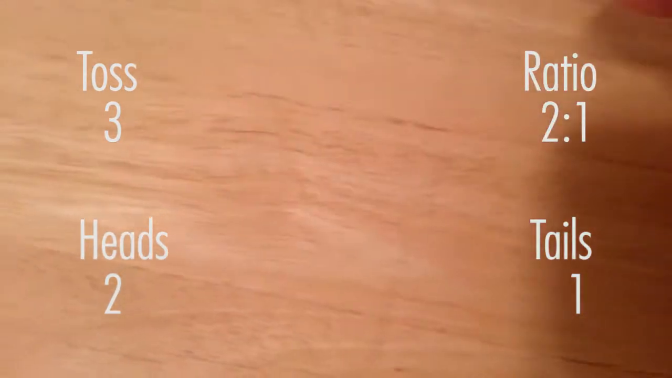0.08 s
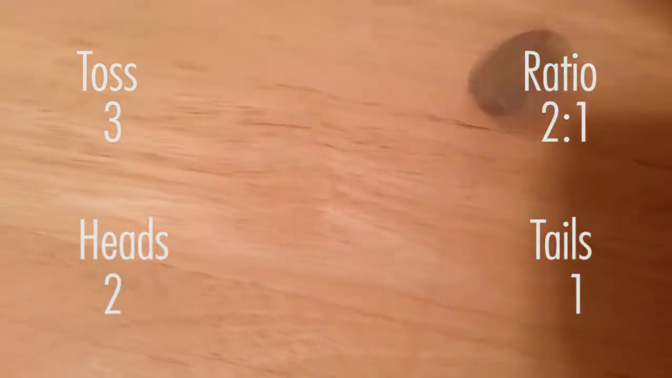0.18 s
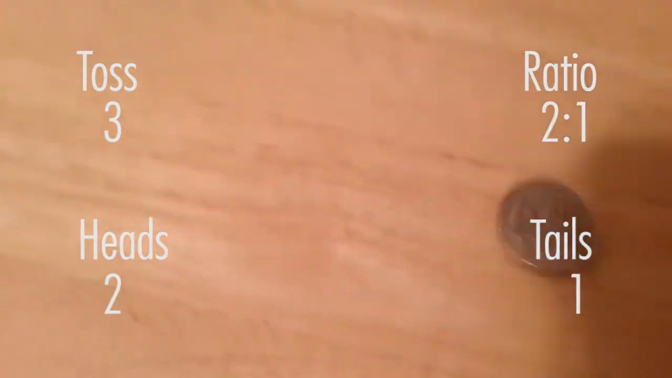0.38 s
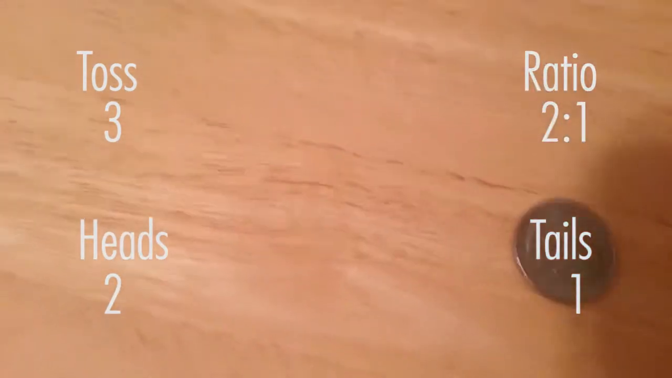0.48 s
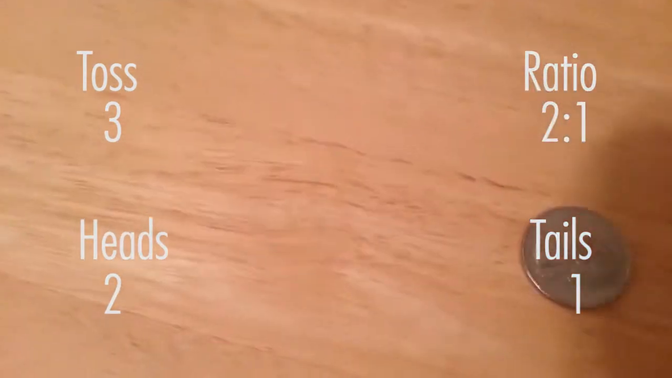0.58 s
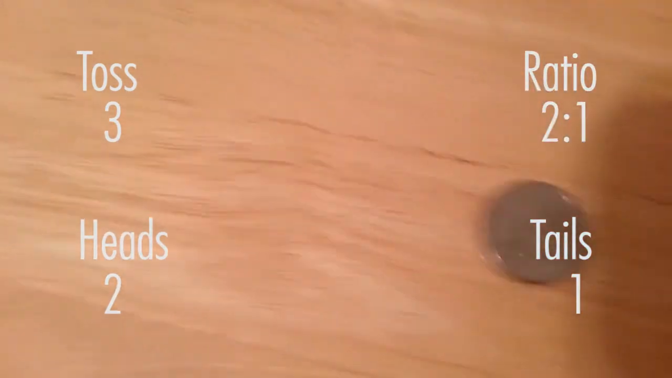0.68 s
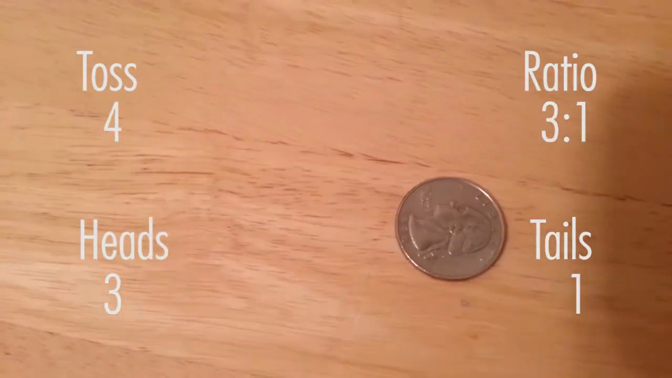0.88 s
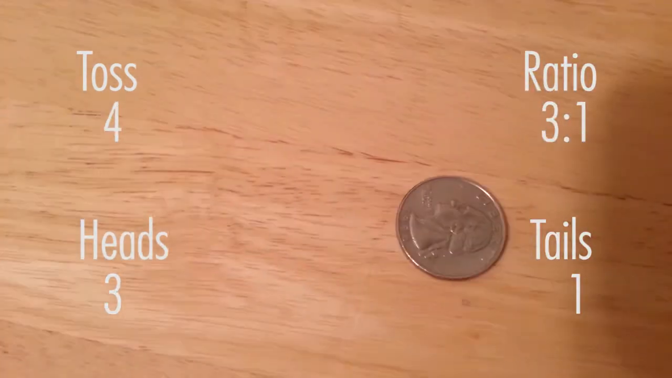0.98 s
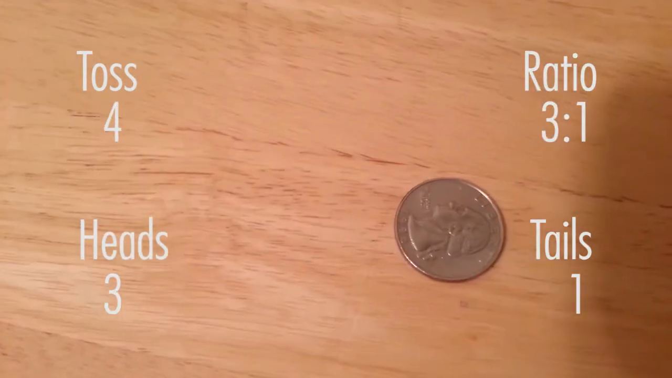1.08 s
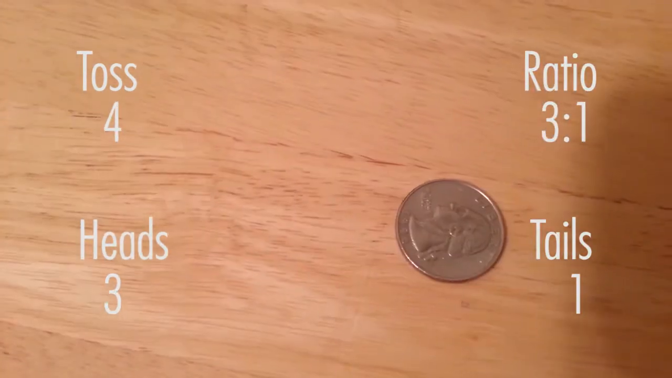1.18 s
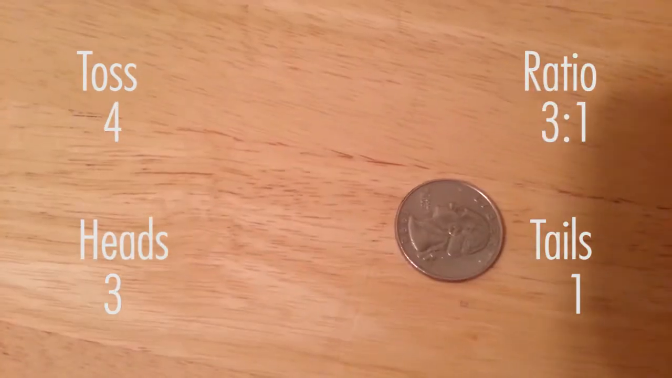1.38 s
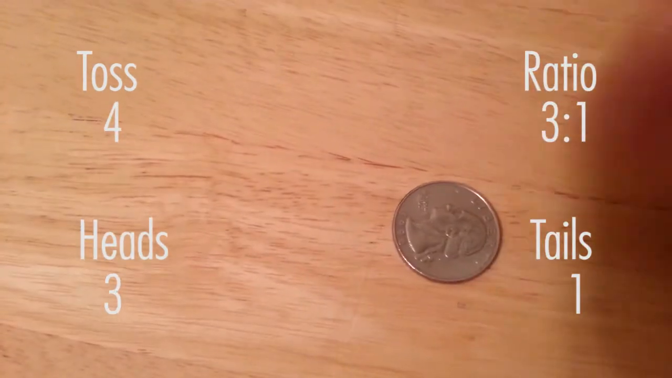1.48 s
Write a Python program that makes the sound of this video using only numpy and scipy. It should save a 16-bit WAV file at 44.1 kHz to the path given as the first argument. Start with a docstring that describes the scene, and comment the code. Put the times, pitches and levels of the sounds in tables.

```python
"""First a low hum with hiss, a faint fuzzy tone dying away and soft low bumps; then a metal coin lands
on a wooden table in a small quiet room, bounces and wobbles to rest.
Each touch is a force that excites the modes of the table top and rings the coin, damping earlier rings.
A rolling rim adds tiny taps and sizzle; decaying noise makes the reverberation.
Two close microphone ports hear it all and clip peaks above their ceiling."""
import sys
import numpy as np
from scipy import signal
from scipy.fft import rfft, irfft
from scipy.io import wavfile
from scipy.ndimage import uniform_filter1d

SR = 44100
rng = np.random.default_rng(int(sys.argv[2]) if len(sys.argv) > 2 else 0)


def persist_wave(psi):
    """Save psi, clipped to +-1, as 16-bit WAV."""
    counts = np.round(np.clip(psi, -1, 1) * 32767).astype(np.int16)
    wavfile.write(sys.argv[1], SR, np.atleast_2d(counts).T)


N = 66150


def amp(db):
    """Decibel law: level to amplitude ratio."""
    return 10 ** (np.asarray(db) / 20)


def evened(x):
    """Normalization to unit root-mean-square."""
    return x / np.sqrt(np.mean(x ** 2) + 1e-20)


def read(points, hz):
    """Interpolation along logarithmic frequency."""
    f, value = np.transpose(points)
    return np.interp(np.log(hz + 1), np.log(f + 1), value)


def envelope(points):
    """Amplitude envelope: levels joined linearly in dB, nearly silent outside the points."""
    return amp(np.interp(np.arange(N) / SR, *np.transpose(points), left=-120, right=-120))


def highpass(x, hz, order=2):
    """Butterworth high-pass filtering."""
    return signal.sosfilt(signal.butter(order, hz, "high", fs=SR, output="sos"), x)


def convolved(x, response):
    """Linear superposition: the response to each sample of x, cut to the scene's length."""
    return signal.fftconvolve(np.atleast_2d(x), np.atleast_2d(response), axes=1)[:, :N]


def pair(frames, size, same):
    """Partial coherence: two partly alike arrays of random short-time spectra, and their frequencies."""
    hz = np.fft.rfftfreq(size, 1 / SR)
    a, b, c, d = rng.standard_normal((frames, len(hz), 4)).T
    like = np.clip(read(same, hz), -1, 1)[:, None]
    left = a + 1j * b
    right = like * left + np.sqrt(1 - like ** 2) * (c + 1j * d)
    return hz, np.array([left, right])


def causal(points, size):
    """Minimum phase: the Hilbert transform of log gain gives a causal click, here of unit energy."""
    log_gain = np.log(amp(read(points, abs(np.fft.fftfreq(size, 1 / SR)))))
    click = np.fft.ifft(np.exp(log_gain - 1j * signal.hilbert(log_gain).imag)).real[:size // 2]
    return click / np.linalg.norm(click)


def ringing(modes, t):
    """Modal superposition: a sum of exponentially dying sines, as each port hears them."""
    side = np.array([[.5], [-.5]])  # left, right
    total = 0
    for hz, db, t60, pan_db, lead in modes:
        level = amp(db + side * pan_db - 60 * t / t60)
        total = total + level * np.sin(2 * np.pi * hz * t + side * lead)
    return total


# touches of the coin: (time [s], strength [dB], thud shelf [dB], brightness shelf [dB],
# lasting ring [relative dB], short clink [relative dB], skid scale [s])
TOUCH_EVENTS = [(0.2073, 17, 5, -12, -24, -48, 0.02), (0.2738, 8, 8, -19, -20, -23, 0.0022),
                (.278, 3.5, 5.5, -12, -28, -30, 0.004), (0.3316, 2.5, -2, -20, -16.5, -36, 0.0019),
                (.353, 11.5, -1, 10.5, -9.5, -2, 0.0032), (.359, 5, -1.5, 14, 3, -3, 0.0037),
                (0.4193, 5, 0, 7.5, -12.5, -23, 0.0018), (0.4317, 9.5, -2, 12.5, -15, -8, 0.0015),
                (0.4367, 3.5, 2, 16, -10.5, 0, 0.0029), (0.4494, -3.5, -5, 8, -5.5, 8.5, 0.0026),
                (0.488, 2, -3, 12.5, -18, -13, 0.0015), (0.4962, 8, -0.5, 14, -13, -4, 0.0014),
                (0.5004, 0.5, 3, 6, -9, 4, 0.0032), (0.5105, -4.5, -9, -1, 4.5, 10, 0.0047),
                (0.5399, -4, 5.5, 13, -1, 11, 0.0016), (0.5491, 6, -17, 13, -24, -15, 0.0024),
                (0.5508, -5, -18, 10, 4, 7, 0.00058), (0.5558, -1, -19, 10, 7, 0, 0.0035),
                (0.5707, -7, 7, 12, 2, 15, 0.00074), (0.5862, -1.5, -6, 13, 4, 4, 0.0017),
                (0.5945, 2, -4, 10, 7, -3, 0.00067), (0.5975, -1.5, 1, -7, 2, 7, 0.00094),
                (0.5998, -4.5, -5, 15.5, 0, 15, 0.0012), (0.6025, -6.5, -6, 14, -1, 16, 0.00057),
                (.609, -9.5, -15, 12, 18, 17, 0.0051), (.618, -19, -5, 18, 26, 19, 0.0018),
                (0.6301, -20, -10, -7, 28, 8, 0.005), (.6357, -6.5, -12, 13, 12, 18.5, 0.0034),
                (0.6377, -2, -26, 12, -8, 2, 0.0037), (0.643, -8, -21, -14, 13, 1, 0.0019),
                (.658, -21, -10, 13, 10, 16, 0.0012), (0.665, -9.5, -12, 14, 2, 3, 0.0018),
                (0.6728, -6, -9, 13, 2, 5, 0.0028), (0.6763, -1.5, -35, 8.5, 6, -6, 0.0015),
                (0.71, -6, -16, 13, -2, 1, 0.0037), (0.7123, -5, -20, 8, 8.5, -16, 0.0057),
                (0.7445, -5.5, -17, 8, -5, 2, 0.0011), (0.7471, 1, -5, 11, -23, -20, 0.0023),
                (0.7538, -15, 5, 7, -7, 2, 0.0007), (0.7623, -9.5, 15, 12, 1, 1, 0.00067),
                (0.772, -8, 3, 1, -3, -2, 0.0022), (.776, -2.5, -25, 12, 1.5, -4, 0.0016),
                (0.7907, -15, -20, -5, 16, 5, 0.00074), (0.805, 0, -39, 10.5, -10, -8, 0.0026),
                (0.8307, -6.5, -15, 14, 0, -14, 0.0022), (0.839, -19, -10, -5, 14.5, 5, 0.0024),
                (0.8548, -5, 3, 13.5, -22, -15, 0.0059), (0.8622, -11, -13, 13.5, -19, -16, 0.00088),
                (0.8744, -2.5, 5, 8.5, -1, -14, 0.0035), (0.8907, -3, -7, 10, -6, -16, 0.0026),
                (0.9047, -10.5, 1, 7, -33, -18, 0.0011)]
# rim rolling on the wood: (time [s], relative level [dB])
ROLL_LEVELS = [(.48, -56), (.55, -49), (.62, -49), (0.701, -48), (.75, -66), (0.818, -40.5), (0.9, -43.5),
               (.912, -79)]
ROLL_PER_S = 1500  # mean taps per second
THUD_HZ, BRIGHT_HZ = 700, 4450  # corners of the low and high shelves
TAP_DB, TAP_FADE_DB_PER_S = 0, -14  # the first tap softens as the coin lies flatter
EVEN_HZ = 400  # a skid pushes evenly across bands of this width
SPOTS = 4  # places on the table that the coin hits
SETTLE_S = .65  # from here on the coin stays on its last two spots


def contacts():
    """Impact and friction: a tap and short skid per touch, by spot, and random taps of the rolling rim."""
    taps, t = np.zeros((SPOTS, N)), np.arange(1024) / SR
    grit = rng.standard_normal((len(TOUCH_EVENTS), 1024)) ** 3
    hz = np.fft.rfftfreq(2048, 1 / SR)
    low = 1 / (1 + 1j * hz / THUD_HZ) ** 2
    high = 1 / (1 - 1j * BRIGHT_HZ / (hz + 1)) ** 2
    first_s = TOUCH_EVENTS[0][0]
    for k, (s, db, thud_db, bright_db, _, _, skid_s) in enumerate(TOUCH_EVENTS):
        u = t / np.clip(skid_s / 2, .0003, .0025)
        push = rfft(grit[k] * np.sqrt(u) * np.exp(-u), 2048)
        push = push / np.sqrt(uniform_filter1d(abs(push) ** 2, size=round(EVEN_HZ / hz[1])))
        skid = irfft(push)[:1024]
        tap = amp(TAP_DB + TAP_FADE_DB_PER_S * (s - first_s)) * (t == 0)
        force = tap + skid / np.linalg.norm(skid)
        shelves = (1 + (amp(thud_db) - 1) * low) * (1 + (amp(bright_db) - 1) * high)
        force = irfft(rfft(force, 2048) * shelves)
        spot = k % 2 + 2 * (s > SETTLE_S)
        taps[spot, round(s * SR):][:2048] += amp(db) * force
    rim_taps = rng.standard_normal(N) * (rng.random(N) < ROLL_PER_S / SR)
    return taps, rim_taps * envelope(ROLL_LEVELS) * amp(20.5)


# table-top modes: (frequency [Hz], level [dB], t60 [s], left over right [dB], left phase lead [rad])
TABLE_MODES = [(150, -10, .17, 1, -.1), (253, -4, .14, 1, 0), (367, -1, .15, 1, .2), (495, -2, .12, 1, .3),
               (555, 0, .11, 3, .1), (680, -5, .08, 0, .2), (955, -3, .12, -5, 1.4),
               (1104, -4, .13, -2, 2.6), (1179, -2, .15, -1, .1), (1404, -4, .11, 0, -.8),
               (1842, -4, .1, -1, -2.3), (2030, -2, .11, -5, 1.7), (2320, -1, .1, 3, -1.2),
               (2747, -2, .13, -3, .3), (2945, -3, .11, -4, .8), (3181, -4, .09, -2, 0),
               (3352, -5, .09, 3, -.2), (4237, -5, .1, -7, .3), (4880, -6, .07, 3, .9),
               (4940, 0, .025, 3, .9), (5900, -6, .05, 1, 0)]
# how the modes answer where the coin settles: (frequency [Hz], level change [dB])
SETTLED_RESPONSE = [(150, -3), (253, -4.5), (367, -12), (495, -4), (555, 2.5), (955, 5), (1104, 0.5),
                    (1404, -15), (1842, 15), (2030, -2), (2320, 3.5), (2747, 2.5), (2945, -7), (3181, 4.5),
                    (4237, -3.5), (5900, -3)]
# spectrum of the click in the wood: (frequency [Hz], spectral level [dB per Hz])
KNOCK_SPECTRUM = [(30, -56), (70, -42.5), (250, -18), (500, -8), (1000, -7), (2000, -1), (3500, -5.5),
                  (5000, -17.5), (8100, -26.5), (11000, -32.5), (16000, -41.5)]
CLICK_DB, MODES_DB, TAIL_DB = -10, -7.5, -4.5
SPOT_DB, SPOT_LEAD = 2, .8  # most that a spot shifts a mode's level [dB] and phase gap [rad] by chance
LEAD_FULL_HZ = 1000  # below this the ports hear all spots more alike
PORT_LAG = 8  # samples by which the right port hears the click late


def table(force, settled):
    """Modal excitation: a click, the modes of the top as this spot wakes them, and reverberation."""
    t = np.arange(SR // 2) / SR
    modes = np.array(TABLE_MODES)
    hz = modes[:, 0].copy()
    level_chance, lead_chance = rng.uniform(-1, 1, (2, len(modes)))
    modes[:, 1] += SPOT_DB * level_chance + settled * read(SETTLED_RESPONSE, hz)
    modes[:, 4] += SPOT_LEAD * lead_chance * np.minimum(hz / LEAD_FULL_HZ, 1) ** 2
    response = ringing(modes, t) / np.linalg.norm(ringing(TABLE_MODES, t)[0])
    body = convolved(force, response)
    knock = convolved(force, causal(KNOCK_SPECTRUM, size=4096))[0]
    click = np.array([knock, np.roll(knock, PORT_LAG)])
    return amp(CLICK_DB) * click + amp(MODES_DB) * body + amp(TAIL_DB) * convolved(knock, tail())


# coin modes: (frequency [Hz], level [dB], t60 [s], left over right [dB], left phase lead [rad])
COIN_MODES = [(9512, 0, .28, 3, .1), (9760, -1, .035, 7, -.8), (10350, -7, .02, 2, .1),
              (8850, -10, .02, 3, -.1), (12500, -14, .012, -1, 0), (15190, -16, .015, -3, .4)]
RING_DB, RING_TAIL_DB = -25, -2.5
KEPT_DB = -4  # change of a ring's level at each further touch
DAMPING_DB_PER_S2, FLAT_FROM_S = 2500, .45  # the wood damps the ring more as the coin lies flatter
CLINK_S = .0016  # ring heard only while the rim touches; peaks at half this time
COIN_LEAD = .9  # most by which chance shifts the ports' phase gap at each touch [rad]
WOBBLE_DB, WOBBLE_S = 2, .004  # the tumbling disc beams its ring to and fro
CHATTER_DB, CHATTER_HZ = -20.5, 8500  # thin treble of metal on wood


def coin(taps, roll, room):
    """Damped plate vibration: touches ring the disc and damp earlier rings; rolling rings it briefly."""
    x, size = np.zeros((2, N)), SR // 4
    t, times = np.arange(size) / SR, np.array(TOUCH_EVENTS)[:, 0]
    leads = COIN_LEAD * rng.uniform(-1, 1, len(TOUCH_EVENTS))
    for k, (s, db, _, _, ring_db, clink_db, skid_s) in enumerate(TOUCH_EVENTS):
        later = np.searchsorted(times, s + t, side="right") - k - 1.  # touches since this one
        later = np.maximum(uniform_filter1d(later, size=40), 0)
        damped_db = KEPT_DB * later - DAMPING_DB_PER_S2 * max(s - FLAT_FROM_S, 0) * t
        rise = 1 - np.exp(-t / max(skid_s / 2, .0003))
        lasting = amp(ring_db + damped_db) * rise
        clink = amp(clink_db + 10.5) * (2 * t / CLINK_S) ** 2 * np.exp(1 - 4 * t / CLINK_S)
        shifted = np.array(COIN_MODES) + [0, 0, 0, 0, leads[k]]
        x[:, round(s * SR):][:, :size] += amp(db) * (lasting + clink) * ringing(shifted, t)
    x += amp(-2) * convolved(roll, ringing(COIN_MODES, t) * np.exp(-t / .0025))
    width = round(WOBBLE_S * SR)
    drift = uniform_filter1d(uniform_filter1d(rng.standard_normal((2, N)), width), width)
    x = amp(RING_DB) * x * amp(WOBBLE_DB * evened(drift))
    x += amp(CHATTER_DB) * highpass(taps + amp(9.5) * roll, CHATTER_HZ)
    return x + amp(RING_TAIL_DB) * signal.fftconvolve(x, room, axes=1)[:, :N]


# treble sizzle while the rim rolls: (time [s], level [dB])
SIZZLE_LEVELS = [(.36, -62), (.44, -50), (.53, -48), (.6, -36), (.65, -40), (.7, -54), (.77, -48),
                 (.83, -61), (.9, -58), (.92, -75)]
SIZZLE_PER_S, SIZZLE_HZ = 9000, 9000  # mean ticks per second, high-pass corner


def sizzle():
    """Random impulse noise: dense tiny ticks of metal on wood grain, unlike at the two ports."""
    ticks = rng.standard_normal((2, N)) * (rng.random((2, N)) < SIZZLE_PER_S / SR)
    return evened(highpass(ticks, SIZZLE_HZ)) * envelope(SIZZLE_LEVELS)


# reverberation: (frequency [Hz], t60 [s])
TAIL_DECAY = [(100, 0.12), (300, 0.13), (1000, 0.096), (3000, 0.09), (7000, .1), (10000, 0.04),
              (14000, 0.035)]
# reverberation at the two ports: (frequency [Hz], left-right likeness [-1 to 1])
TAIL_LIKENESS = [(100, 1), (400, 0.77), (1000, 0.0), (1800, -0.18), (3000, -0.0085), (10000, -0.31)]
LATE_DB, LATE_STRETCH = -6.5, 3.57  # the room's longer, weaker decay under the table's


def tail():
    """Diffuse reverberation of table and room: dense noise, each band dying at its own speed."""
    frames, hop = 400, 64
    hz, z = pair(frames, size=256, same=TAIL_LIKENESS)
    t = np.arange(frames) * hop / SR
    fall_db = -60 * t / np.maximum(read(TAIL_DECAY, hz), .02)[:, None]
    decay = amp(fall_db) + amp(LATE_DB + fall_db / LATE_STRETCH)
    x = signal.istft(z * decay, nperseg=256, noverlap=256 - hop)[1]
    return x / np.linalg.norm(x[0])


# soft low bumps before the landing: (start [s], envelope peak [dB], frequency [Hz])
EARLY_BUMPS = [(.15, -37.5, 135), (.17, -40, 135), (.187, -55, 130)]
BUMP_S = .021  # from start to envelope peak
FAINT_HZ, FAINT_WIDTH_HZ, FAINT_DB, FAINT_S = 1170, 40, -60, .09  # Gaussian fade to 1/e in FAINT_S


def before():
    """Damped oscillation and resonance: soft low bumps, and noise narrowed to a fuzzy dying tone."""
    t = np.arange(N) / SR
    x = np.zeros(N)
    for s, db, hz in EARLY_BUMPS:
        u = np.maximum(t - s, 0)
        swell = np.e * u / BUMP_S * np.exp(-u / BUMP_S)
        x += amp(db) * swell * np.sin(2 * np.pi * hz * u)
    r = np.exp(-np.pi * FAINT_WIDTH_HZ / SR)  # pole radius
    poles = [1, -2 * r * np.cos(2 * np.pi * FAINT_HZ / SR), r * r]
    fuzz = evened(signal.lfilter([1], poles, rng.standard_normal(N)))
    return x + amp(FAINT_DB) * fuzz * np.exp(-(t / FAINT_S) ** 2)


# background spectrum: (frequency [Hz], relative spectral level [dB per Hz])
FLOOR_SPECTRUM = [(15, -43), (25, -9), (65, 1.5), (185, -14.5), (300, -16), (420, -21), (1100, -28),
                  (2500, -31), (4200, -32.5), (5400, -29.5), (7500, -34.5), (14800, -37), (15800, -58.5)]
# background at the two ports: (frequency [Hz], left-right likeness [-1 to 1])
FLOOR_LIKENESS = [(60, .6), (240, .9), (950, .1), (3770, .15), (15000, .1)]
FLOOR_DB = -46.5
RUMBLE_HZ, RUMBLE_SWELL_DB = 300, .8  # the hum below this pitch swells and sinks


def floor():
    """Stationary shaped noise with a slow bass modulation: wavering room hum and microphone hiss."""
    frames = N // 256 + 5
    hz, z = pair(frames, size=1024, same=FLOOR_LIKENESS)
    swell = evened(uniform_filter1d(rng.standard_normal(frames), size=8))
    swell_db = RUMBLE_SWELL_DB * swell / (1 + (hz[:, None] / RUMBLE_HZ) ** 2)
    gain = amp(read(FLOOR_SPECTRUM, hz)[:, None] + swell_db)
    noise = signal.istft(z * gain, nperseg=1024, noverlap=768)[1][:, :N]
    return amp(FLOOR_DB) * evened(noise)


WOOD_HZ = 152  # high-pass corner of the wood sound


def scene():
    """Superposition of table, coin, sizzle and background at the two ports."""
    taps, roll = contacts()
    late = np.arange(N) / SR > SETTLE_S
    wood = np.zeros((2, N))
    for k, force in enumerate(taps):
        settled = k >= SPOTS // 2
        # the two spots in use share the rolling equally
        wood += table(force + .5 * roll * (late == settled), settled)
    wood = amp(9.5) * highpass(wood, WOOD_HZ, order=3)
    return wood + coin(taps.sum(0), roll, tail()) + sizzle() + floor() + before()


CEILING = .98  # amplitude at which the ports clip
MIC_HZ, EDGE_HZ = 65, 16100  # bass roll-off and upper band limit


def record(dry):
    """Hard clipping and linear filtering: overload, bass roll-off, then the band limit."""
    clipped = np.clip(dry, -CEILING, CEILING)
    thin = highpass(clipped, MIC_HZ)
    lowpass = signal.firwin(511, EDGE_HZ, window=("kaiser", 9), fs=SR)
    band = signal.oaconvolve(thin, lowpass[None], "same")
    return np.clip(band, -1, 1)


dry = scene()
out = record(dry)
persist_wave(out)
```